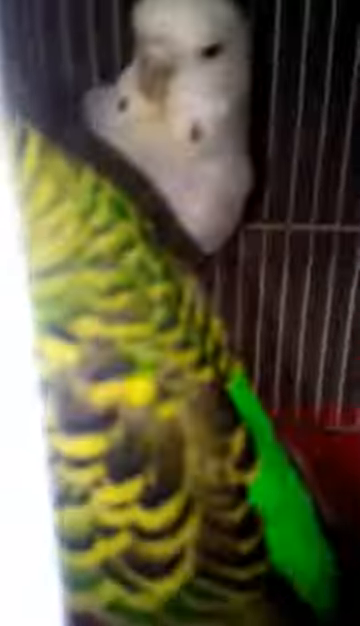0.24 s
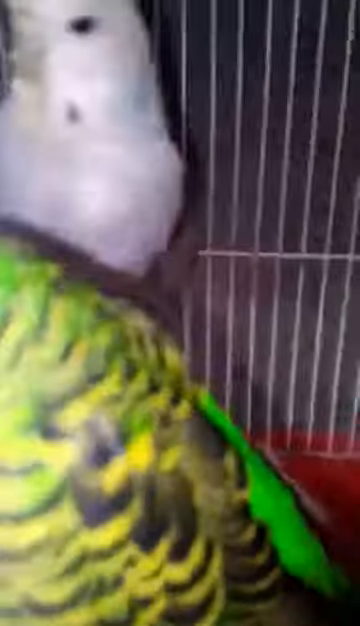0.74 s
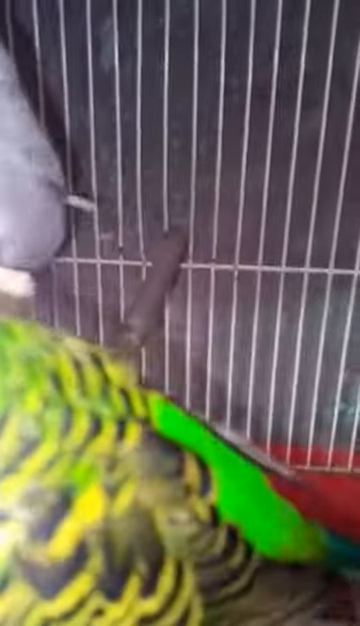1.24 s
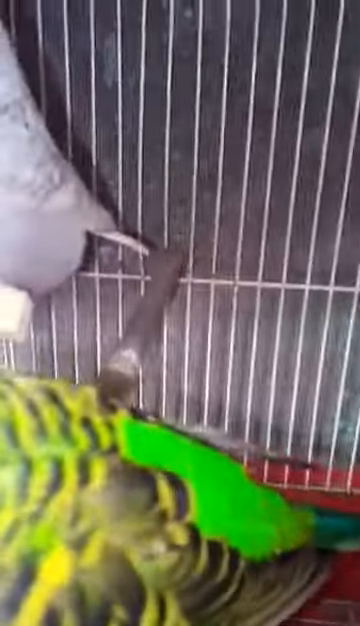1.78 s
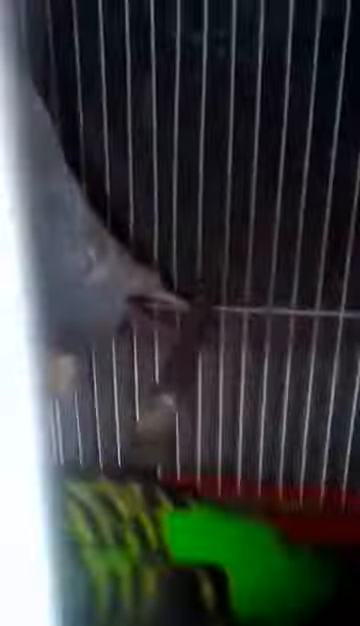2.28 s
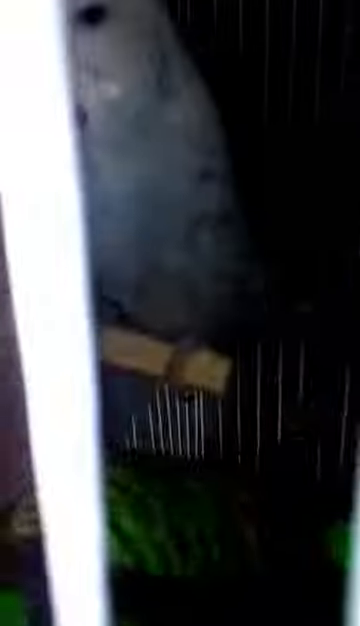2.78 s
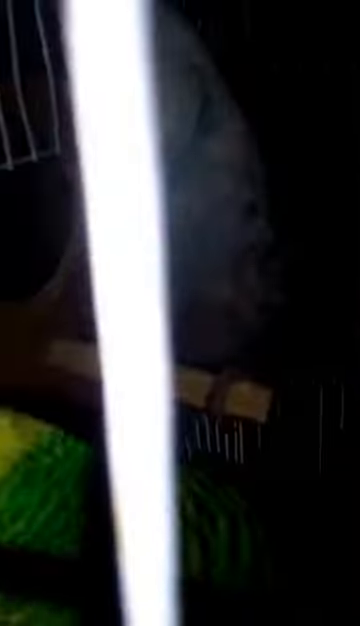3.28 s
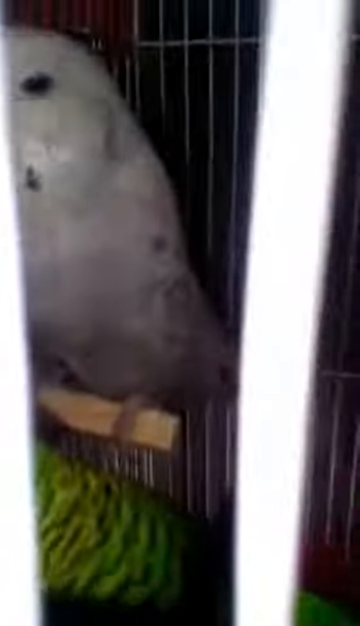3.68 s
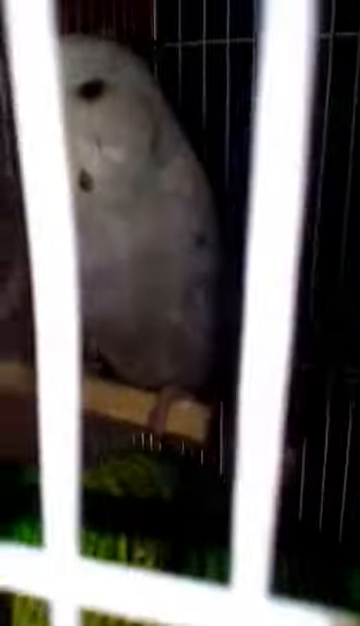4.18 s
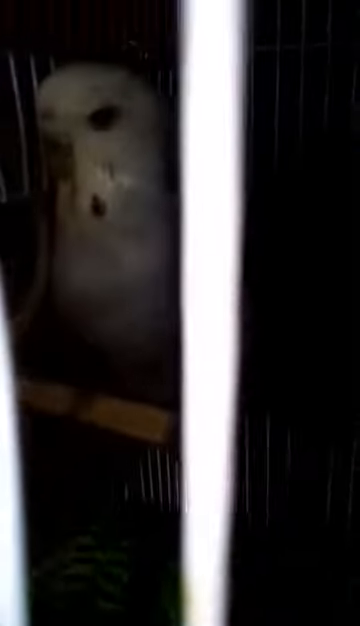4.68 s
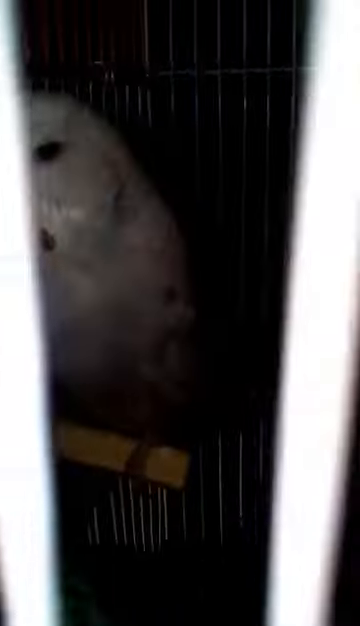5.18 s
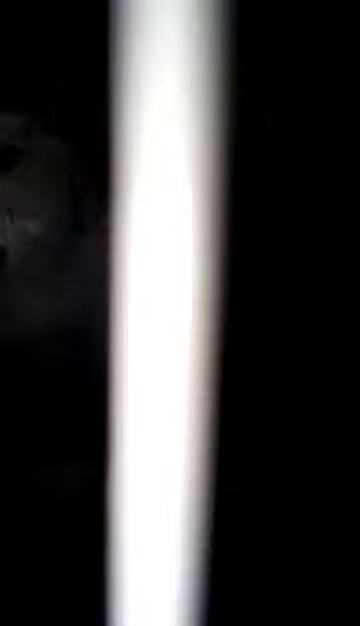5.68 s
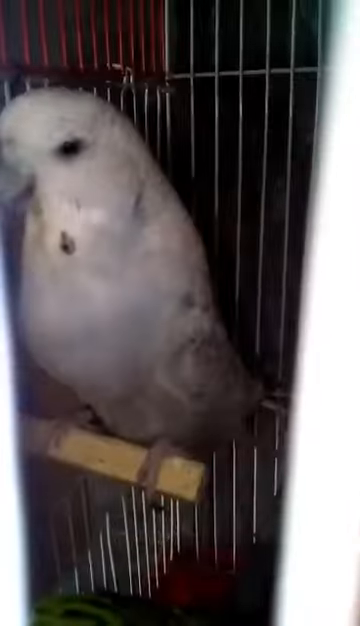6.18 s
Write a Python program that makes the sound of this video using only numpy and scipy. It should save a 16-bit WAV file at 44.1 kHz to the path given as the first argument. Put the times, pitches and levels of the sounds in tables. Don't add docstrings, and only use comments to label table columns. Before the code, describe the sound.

Raspy chick cries and shrill chirps overlap in a small hard room, then thin out before a close budgie warbles and chatters amid handling bumps.

```python
import sys
import numpy as np
from scipy import signal
from scipy.io import wavfile
from scipy.ndimage import uniform_filter1d

SR = 44100
rng = np.random.default_rng(int(sys.argv[2]) if len(sys.argv) > 2 else 0)


def master_out(mix):
    frames = np.transpose(np.atleast_2d(mix))
    ceiling = np.clip(frames, -1, 1)
    pcm = np.round(ceiling * 32767).astype(np.int16)
    wavfile.write(sys.argv[1], SR, pcm)


def elevation(decibels):
    levels = np.asarray(decibels, float)
    return 10 ** (levels / 20)


N = 284004


def filtered(x, order, hz, kind):
    return signal.sosfilt(signal.butter(order, hz, kind, fs=SR, output="sos"), x)


def rms_one(x):
    return x / np.sqrt(np.mean(x ** 2) + 1e-20)


def drift(rate_hz):
    r = np.exp(-2 * np.pi * rate_hz / SR)
    noise = rng.standard_normal(N + SR)
    return rms_one(signal.lfilter([1], [1, -2 * r, r * r], noise)[SR:])


def ring(clicks, hz, t60_s):
    r, w = elevation(-60 / (t60_s * SR)), 2 * np.pi * hz / SR
    return signal.lfilter([0, np.sin(w)], [1, -2 * r * np.cos(w), r * r], clicks + 1e-18)


def banded_noise(spectrum, patchy_db, patch_hz, together, extra_db=lambda hz: 0):
    hz_points, db_points = np.transpose(spectrum)
    edges = hz_points[0] * 2 ** np.arange(0, np.log2(hz_points[-1] / hz_points[0]), 1 / 3)
    white, shared = rng.standard_normal((2, N)), drift(patch_hz)
    out, power = 0, 0
    for k, (low, high) in enumerate(zip(edges, edges[1:])):
        band = filtered(white[k % 2], 2, [low, high], "band")
        hz = np.sqrt(low * high)
        gain = elevation(np.interp(np.log(hz), np.log(hz_points), db_points))
        power += gain ** 2 * np.mean(band ** 2)
        flicker = together * shared + (1 - together) * drift(patch_hz)
        out = out + band * gain * elevation(patchy_db * flicker + extra_db(hz))
    return out / np.sqrt(power)


def bursts_db(starts, holds, peak_db, rest_db, rise_db_per_s, fall_db_per_s):
    t = np.arange(0, N, 32) / SR
    early = np.maximum(starts[:, None] - t, 0)
    late = np.maximum(t - (starts + holds)[:, None], 0)
    each_db = peak_db[:, None] - rise_db_per_s * early - fall_db_per_s * late
    power = elevation(2 * each_db).sum(axis=0) + elevation(2 * rest_db)
    return np.interp(np.arange(N) / SR, t, 10 * np.log10(power))


def calls(table, waver, waver_hz, flutter_db, flutter_hz, rise_s):
    out, shake = np.zeros(N), drift(waver_hz)
    flutter = rms_one(elevation(flutter_db * drift(flutter_hz)))
    for k, (start, length, from_hz, to_hz, tone_db, octave_db) in enumerate(table):
        i = round(start * SR)
        t = np.arange(min(round(length * SR), N - i)) / SR
        own = (i + 7919 * k + np.arange(len(t))) % N
        pitch_hz = (from_hz + (to_hz - from_hz) * t / length) * (1 + waver * shake[own])
        phase = 2 * np.pi * np.cumsum(pitch_hz) / SR
        envelope = np.clip(np.minimum(t / rise_s, (length - t) / (0.35 * length)), 0, 1)
        upper = np.sin(2 * phase) + 0.086 * np.sin(3 * phase) + 0.022 * np.sin(4 * phase)
        out[i:i + len(t)] += envelope * flutter[own] * (elevation(tone_db) * np.sin(phase) + elevation(octave_db) * upper)
    return out


def with_octave(table, law):
    hz, db = np.transpose(law)
    return [(*row, row[4] + np.interp((row[2] + row[3]) / 2, hz, db)) for row in table]


def with_glide(table, glide):
    return [(s, length, hz * (1 - glide / 2), hz * (1 + glide / 2), tone_db, octave_db)
            for s, length, hz, tone_db, octave_db in table]


# start_s, hold_s, level_db, brightness_db, depth_db
BREATHS = [(0, 0.13, -42, -6.5, 7), (0.123, 0.16, -28.5, -12.5, -9), (0.325, 0.14, -29.5, -11, -5.5),
           (0.563, 0.15, -41.5, -24, 1), (0.73, 0.072, -53, 8, -4), (0.98, 0.24, -54.5, 2.5, 3.5),
           (1.35, 0.15, -51.5, 3.5, 5.5), (1.526, 0.15, -27.5, -18, -6.5), (1.778, 0.066, -33.5, -4.5, -2),
           (1.95, 0.083, -30, -8.5, -4.5), (2.059, 0.036, -25, -6, -5.5), (2.21, 0.14, -27, -3.5, -9.5),
           (2.437, 0.15, -40, 6, -4.5), (2.564, 0.18, -34, -3, -2), (3.25, 0.12, -50, -2, 0),
           (3.582, 0.079, -49, -1.5, 8), (3.725, 0.3, -48, -9, 1), (4.71, 0.2, -55, 12, 17),
           (4.994, 0.1, -32.5, -5, -1), (5.197, 0.34, -51.5, 5.5, 14.5), (5.474, 0.21, -55, 3.5, 12),
           (2.799, 0.016, -44, 9, 10), (5.793, 0.14, -48, -4.5, 3.5), (6.384, .06, -53, -8, 2)]
# frequency_hz, density_db (per Hz)
BEAK_SPECTRUM = [(1400, 5.5), (1750, -11), (2200, 2.5), (3300, -2), (4700, -3), (6500, 3), (7600, 3.5),
                 (8600, -16), (9800, -18), (11500, -12.5), (15000, -45)]


def hiss():
    s, hold, db, bright_db, deep_db = np.transpose(BREATHS)

    def course(extra_db, rest_db):
        return bursts_db(s, hold, db + extra_db, rest_db - 56, rise_db_per_s=707, fall_db_per_s=108)

    middle_db = course(0, 0)
    high_db, low_db = course(bright_db, -1) - middle_db, course(deep_db, 3) - middle_db

    def lean(hz):
        highness, lowness = np.clip(np.log2(hz / 4700) * 2, 0, 1), np.clip(np.log2(4200 / hz) * 2, 0, 1)
        return high_db * highness + low_db * lowness

    level = elevation(middle_db + 4.5 + 1.53 * drift(40) + 1.2 * drift(130))
    air = level * banded_noise(BEAK_SPECTRUM, patchy_db=3.5, patch_hz=9, together=0.2, extra_db=lean)
    return filtered(air, 4, 1600, "high")


STILL_HAND_DB = -68.5
# start_s, hold_s, rumble_db
GRIPS = [(0, 0.0043, -46), (0.126, 0.0093, -32), (0.253, 0.058, -52), (0.71, 0.03, -50),
         (1.016, 0.012, -57), (1.734, 0.28, -53), (1.87, 0.21, -48), (2.1, 0.12, -57.5),
         (2.416, 0.18, -58.5), (2.71, 0.13, -48), (2.933, 0.05, -53), (3.31, 0.017, -64),
         (3.473, 0.12, -60), (4.07, 0.024, -54), (4.885, 0.033, -52.5), (5.096, 0.22, -63),
         (5.45, 0.041, -40), (5.57, 0.24, -55), (5.863, 0.1, -49.5), (6.14, 0.059, -63)]


def grip_level():
    return bursts_db(*np.transpose(GRIPS), STILL_HAND_DB, rise_db_per_s=437, fall_db_per_s=264.5)


# frequency_hz, density_db (per Hz)
RUMBLE_SPECTRUM = [(15, -34), (25, -57), (54, 1.5), (119, -5.5), (167, -8.5), (204, -12.5), (260, -6),
                   (340, -60), (570, -120)]


def hand(grip_db):
    return elevation(grip_db - .1) * banded_noise(RUMBLE_SPECTRUM, patchy_db=4, patch_hz=9, together=.7)


# time_s, rustle_db
RESTLESSNESS = [(0, -52), (.5, -48), (.95, -48.5), (2.1, -51.5), (2.9, -52.5), (3.38, -47.5), (4.03, -51),
                (4.2, -54.5), (4.6, -56.5), (4.95, -51), (5.4, -50.5), (5.8, -52), (6.44, -53)]
# frequency_hz, density_db (per Hz)
RUSTLE_SPECTRUM = [(120, -39), (200, -26), (449, -1), (603, -4), (686, -6), (863, -5), (946, -4.5),
                   (1170, -5), (1800, -14.5), (2340, -41), (3960, -120)]


def bedding(grip_db):
    s, db = np.transpose(RESTLESSNESS)
    rustle_db = np.interp(np.arange(N) / SR, s, db) + 0.27 * (grip_db - STILL_HAND_DB)
    return elevation(rustle_db - 3.5) * banded_noise(RUSTLE_SPECTRUM, patchy_db=5.0, patch_hz=20.5, together=0.35)


# start_s, length_s, pitch_hz, tone_db
WHINES = [(0.211, 0.07, 3305, -17.5), (.35, 0.32, 3760, -28), (0.368, 0.054, 4140, -24),
          (.4, 0.14, 3382, -21.5), (0.437, 0.094, 2463, -24.5), (0.515, 0.045, 3105, -21.5),
          (0.708, 0.062, 2622, -20.5), (0.814, 0.14, 3753, -23.5), (0.859, 0.12, 3368, -27),
          (1.517, 0.064, 4510, -29), (1.541, 0.084, 3960, -24.5), (1.624, 0.026, 4450, -25.5),
          (3.639, 0.058, 2810, -42.5), (4.155, 0.075, 2236, -38), (4.847, 0.054, 2667, -31),
          (4.932, 0.046, 2756, -31), (4.988, 0.06, 3820, -27), (5.4, 0.027, 2070, -51),
          (5.93, 0.075, 3510, -50)]
# start_s, length_s, pitch_hz, tone_db, octave_db
SQUEALS = [(.47, 0.04, 1988, -27, -30), (1.07, 0.18, 2734, -53, -44), (2.199, 0.1, 3150, -29.5, -14.5),
           (2.25, 0.15, 3530, -40, -27), (2.63, 0.094, 2740, -37, -24), (3.265, 0.12, 2637, -45.5, -39),
           (3.785, 0.07, 2667, -36.5, -44.5), (4.4, 0.198, 2420, -50.5, -50.5),
           (5.025, 0.079, 2950, -24, -22), (4.97, 0.023, 2850, -33, -25), (4.79, 0.066, 3400, -60, -41),
           (.745, .07, 3880, -40, -31), (3.72, .04, 2600, -50, -44), (3.88, .06, 2480, -50, -44)]
# start_s, length_s, pitch_hz, tone_db, octave_db
PLEAS = [
    (.07, 0.055, 2510, -27, -40),
    (2.12, 0.064, 3400, -31.5, -19),
    (2.443, 0.11, 3324, -36, -15.5),
    (3.575, 0.054, 2138, -36.5, -42),
    (4.04, 0.0436, 2600, -34, -69),
    (4.94, 0.05, 2780, -31, -35.5),
]
# start_s, length_s, from_hz, to_hz, tone_db
MEWS = [(1.345, 0.045, 2940, 2860, -47.5), (1.465, 0.037, 2660, 2580, -47), (1.515, 0.028, 2495, 2420, -36),
        (2.07, 0.061, 3200, 3300, -29.5), (2.26, 0.059, 3760, 3600, -29), (2.31, 0.063, 3260, 3780, -30),
        (2.61, 0.13, 4080, 4040, -33), (3.625, 0.099, 2276, 2620, -41), (3.74, 0.077, 2480, 2550, -37.5),
        (3.875, 0.065, 2705, 2370, -39.5), (4.04, 0.064, 2210, 2187, -41.5), (4.075, .12, 2736, 2620, -49),
        (4.19, 0.094, 2280, 2230, -56), (4.758, 0.017, 2380, 2920, -29.5), (4.805, .05, 2480, 2464, -30),
        (4.855, 0.048, 2980, 2737, -34.5), (4.88, 0.038, 2726, 2570, -43),
        (4.985, 0.091, 2310, 2403, -31.5)]
# pitch_hz, octave_db
CHICK_OCTAVE = [(1800, -16), (2500, -10.5), (3900, -14.5)]


def husky_calls():
    table = with_glide([(*row, row[3] - 19) for row in WHINES], -0.0261)
    table += with_glide(SQUEALS, -0.0088)
    table += with_glide(PLEAS, 0.1208)
    table += with_octave(MEWS, CHICK_OCTAVE)
    return calls(table, waver=.043, waver_hz=350, flutter_db=3, flutter_hz=150, rise_s=.004)


# start_s, peak_db, hardness_hz
KNOCKS = [
    (0.0938, -4, 1810),
    (0.113, -10.5, 706),
    (4.0662, -9.5, 890),
    (5.453, -20, 400),
]
# frequency_hz, level_db, t60_s
BOX_MODES = [(110, -51, 0.25), (220, -9.5, 0.11), (277, 1.5, 0.07), (420, -13, 0.053), (513, 11.5, 0.032),
             (854, 8, 0.023)]


def knocks():
    out = np.zeros(N)
    for s, db, hard_hz in KNOCKS:
        i = round(s * SR)
        press = 2 * np.pi * hard_hz * np.arange(SR // 4) / SR
        blow = press * np.exp(-press) * 2 * np.pi * hard_hz / SR
        for hz, mode_db, t60_s in BOX_MODES:
            strength = elevation(db + mode_db - 19 + rng.normal(0, 0.093))
            out[i:i + SR // 4] += strength * ring(blow, hz, t60_s)
    return out


# start_s, length_s,
# from_hz, to_hz, tone_db
CHIRPS = [(.103, 0.061, 3970, 3710, -24.5), (.169, 0.048, 3040, 3545, -16), (.715, 0.011, 1885, 1880, -17),
          (.741, 0.075, 3746, 4038, -16), (.801, 0.06, 3153, 3388, -15), (1.428, 0.041, 2452, 2590, -35),
          (1.575, 0.016, 1740, 1860, -29), (1.579, 0.22, 3503, 3718, -20), (3.723, 0.016, 2510, 2550, -28),
          (4.012, 0.034, 2210, 2274, -39), (4.16, 0.11, 831, 800, -52), (4.73, 0.016, 2720, 2750, -50),
          (5.233, 0.0078, 2380, 2380, -20), (5.252, 0.026, 3730, 3550, -25),
          (5.268, 0.021, 1720, 1970, -30), (.895, 0.1, 621, 619, -48.5), (.9, .08, 458, 428, -51),
          (1.19, 0.13, 612, 611, -50), (1.5, 0.07, 1032, 1044, -42), (2.56, 0.098, 1254, 1234, -45),
          (3.32, 0.2, 621, 609, -49), (4.86, 0.094, 894, 865, -49), (5.74, .28, 620, 622, -55),
          (6.125, .09, 623, 615, -51), (6.13, 0.064, 415, 407, -50), (.19, .13, 3900, 3950, -32),
          (.52, .17, 3980, 3920, -35.5), (3.79, 0.051, 2800, 2780, -44), (3.88, 0.035, 2620, 2540, -53),
          (3.915, .03, 2420, 2290, -44)]


def chirps():
    table = with_octave(CHIRPS, CHICK_OCTAVE)
    return calls(table, waver=.025, waver_hz=250, flutter_db=3.2, flutter_hz=80, rise_s=.008)


# start_s, level_db
PUFFS = [(.123, -58), (.242, -61), (.331, -56), (.965, -62), (1.428, -62), (1.946, -54), (2.062, -52),
         (2.456, -52), (2.792, -53), (4.765, -43), (4.85, -49), (5.396, -55), (2.2, -54), (2.565, -54),
         (5.03, -55), (4.953, -57)]


def puffs():
    t = np.arange(N) / SR
    fade_s = 0.036
    envelope = sum(elevation(db) * (t > s) * np.exp(-np.abs(t - s) / fade_s) for s, db in PUFFS)
    return envelope * rms_one(filtered(rng.standard_normal(N), 4, 8000, "high"))


# start_s, length_s, pitch_hz, tone_db, octave_db
RASPS = [(.124, 0.066, 3190, -21, -25.5), (.342, 0.043, 3157, -27.5, -18.5), (.56, 0.055, 3390, -32, -34),
         (1.54, 0.092, 3143, -25.5, -34.5), (1.66, 0.091, 3300, -31, -24.5), (1.793, 0.021, 3270, -25, -18),
         (1.95, 0.06, 2796, -29.5, -21.5), (2.062, 0.062, 3007, -33, -18),
         (2.565, 0.07, 2925, -31.5, -16.5), (2.57, 0.1, 3980, -29.5, -67), (3.965, 0.039, 1987, -39.5, -45),
         (5.06, 0.17, 2357, -29, -45), (5.08, 0.17, 3284, -22.5, -34), (5.14, 0.13, 2322, -30.5, -55),
         (5.68, 0.012, 2103, -35, -52), (.74, .2, 3550, -29, -50), (.72, .09, 3000, -32, -50),
         (2.45, .1, 3250, -33, -30), (4.855, .03, 2850, -36, -34), (4.768, .03, 2450, -34, -38)]


def rasps():
    table = with_glide(RASPS, -0.013)
    return calls(table, waver=.1, waver_hz=400, flutter_db=2.2, flutter_hz=200, rise_s=.008)


# start_s, peak_db, frequency_hz
THUMPS = [(0.242, -31, 101), (0.698, -38, 110), (1.497, -41, 110), (1.946, -34, 207), (2.513, -30, 76),
          (4.083, -34, 75.5), (1.007, -47, 86.5), (1.2, -52, 67.3), (1.43, -53, 94.5), (1.734, -40, 120),
          (1.87, -38, 95), (2.159, -47.5, 180), (2.2, -49, 80), (2.415, -49, 74), (2.731, -38, 125),
          (2.801, -42, 100), (2.86, -43, 110), (3.05, -46, 67), (3.3, -51, 90), (3.51, -46, 70),
          (3.589, -50, 65), (4.27, -50, 70), (4.396, -53, 94), (4.89, -46, 60), (5.06, -46, 75),
          (5.142, -46, 100), (5.99, -36, 65), (6.106, -46, 78)]


def thumps():
    out, t = np.zeros(N), np.arange(-SR // 50, SR // 20) / SR
    for s, db, hz in THUMPS:
        i = round(s * SR) - SR // 50
        out[i:i + len(t)] += elevation(db) * np.sin(2 * np.pi * hz * t) * np.exp(-((t - .012) / 0.0079) ** 2)
    return out


# start_s, peak_db
TICKS = [(2.9564, -32), (3.291, -29), (3.418, -32), (3.586, -27.5), (3.6671, -33), (4.221, -35.5),
         (4.7972, -21), (4.96, -31), (5.471, -30.5), (6.0463, -34), (6.168, -32), (6.219, -40),
         (1.565, -28), (1.577, -20), (1.641, -24), (4.734, -46), (5.72, -43)]


def ticks():
    s, db = np.transpose(TICKS)
    clicks = np.zeros(N)
    clicks[np.round(s * SR).astype(int)] = elevation(db)
    hits = filtered(clicks, 3, [4500, 7800], "band")
    return elevation(-5) * sum(ring(hits, hz, .018) for hz in (5900, 6400, 6900, 7400))


# start_s, length_s, pitch_hz, level_db
PEEPS = [
    (4.681, 0.059, 903, -42),
    (6.169, .022, 1152, -32),
    (6.19, 0.043, 1123, -43),
    (6.245, 0.045, 1120, -56),
    (6.372, 0.025, 1358, -36.5),
    (6.387, .045, 1320, -45),
]
# frequency_hz, gain_db
PEEP_THROAT = [(900, -7), (1300, -11.5), (2300, -1), (2700, -4), (3400, -8.5), (4300, -17.5), (5500, -20),
               (6800, -26)]


def peeps():
    hz_points, db_points = np.transpose(PEEP_THROAT)
    out, shake, order = np.zeros(N), drift(150), np.arange(1, 8)[:, None]
    for start, length, hz, db in PEEPS:
        i = round(start * SR)
        t = np.arange(round(length * SR)) / SR
        swoop = 1 - .15 * np.exp(-t / 0.0039)
        pitch_hz = hz * swoop * (1 + .008 * shake[i:i + len(t)])
        envelope = np.clip(np.minimum(t / 0.00085, (length - t) / (.5 * length)), 0, 1)
        strength = elevation(db + np.interp(order * hz, hz_points, db_points))
        harmonics = strength * np.sin(2 * np.pi * order * np.cumsum(pitch_hz) / SR)
        out[i:i + len(t)] += envelope * harmonics.sum(axis=0)
    return out


# start_s, length_s, from_hz, to_hz, tone_db
WARBLE = [(4.762, .015, 970, 1200, -41), (4.77, 0.04, 2690, 2300, -25), (5.295, 0.044, 2744, 3020, -18),
          (5.3235, 0.017, 3020, 3080, -28), (5.334, 0.0073, 3190, 3030, -17),
          (5.346, 0.024, 2396, 2256, -20), (5.372, 0.012, 2170, 1820, -21),
          (5.384, 0.0052, 3040, 3000, -45), (5.386, 0.0072, 1570, 1445, -28.5),
          (5.461, .015, 3060, 3200, -31.5), (5.475, 0.0028, 2970, 2900, -26),
          (5.528, 0.0068, 2700, 2730, -20), (5.55, 0.024, 2822, 2846, -17.5),
          (5.568, 0.0087, 3180, 2900, -20), (5.595, .0068, 2960, 2850, -42),
          (5.39, 0.079, 2020, 2046, -40.5), (5.457, 0.016, 1500, 1516, -38), (5.475, .04, 3450, 3960, -37),
          (5.54, 0.018, 1600, 2700, -31), (5.595, 0.076, 2850, 2790, -36.5),
          (5.69, 0.026, 2100, 1800, -40.5),
          (5.785, 0.006, 3070, 2930, -25), (5.79, 0.013, 2740, 1950, -37), (5.8, 0.021, 4090, 3700, -40),
           (5.81, 0.0056, 3070, 3030, -25), (5.823, 0.0078, 3090, 3050, -20),
           (5.839, 0.0046, 2140, 1590, -25), (5.848, 0.0069, 1860, 1940, -28),
           (5.858, 0.028, 2818, 2590, -25), (5.881, .011, 2675, 3180, -17),
           (5.892, 0.0054, 2770, 2830, -26), (5.905, 0.0037, 2270, 3050, -16.5),
           (5.906, 0.019, 3276, 3610, -28), (5.915, 0.081, 2700, 2767, -40), (5.767, .015, 4500, 4000, -48),
           (5.935, 0.055, 3450, 3420, -37), (6.168, 0.0037, 2970, 3180, -25.5),
           (6.37, 0.0039, 2330, 2450, -38), (6.375, 0.0061, 2900, 2900, -38),
           (6.383, 0.013, 5330, 5200, -51)]
# pitch_hz, octave_db
ADULT_OCTAVE = [(700, -13), (1300, 6), (1700, 10), (2300, -39)]


def grown_bird():
    table = with_octave(WARBLE, ADULT_OCTAVE)
    return calls(table, waver=.013, waver_hz=200, flutter_db=2.2, flutter_hz=120, rise_s=.003)


# start_s, peak_db, frequency_hz
JOLTS = [
    (5.4355, -34, 90),
    (5.4541, -20, 128),
    (5.48, -33, 110),
    (5.495, -32, 170),
    (5.518, -38, 190),
    (5.567, -40, 120),
]


def jolts():
    out, t = np.zeros(N), np.arange(-SR // 50, SR // 50) / SR
    for s, db, hz in JOLTS:
        i = round(s * SR) - SR // 50
        out[i:i + len(t)] -= elevation(db + 6) * np.sin(2 * np.pi * hz * t) * np.exp(-(3.2 * hz * t) ** 2)
    return out


def room(x):
    t = np.arange(SR // 2) / SR
    t60_s, level_db = 0.44, -1.5
    tail = rng.standard_normal(len(t)) * elevation(-60 * t / t60_s) * (t > .004)
    return elevation(level_db) * signal.fftconvolve(x, tail / np.sqrt(np.sum(tail ** 2)))[:N]


# start_s, length_s, depth_db
DUCKS = [(0.725, 0.17, 20.5), (1.077, 0.08, 6.5), (1.643, 0.095, 13.5), (2.206, 0.14, 10.5),
         (2.467, 0.093, 17), (2.564, 0.1, 9), (3.202, 0.108, 8), (4.76, .09, 5), (4.4, .08, 6),
         (4.11, .05, 6), (5.327, 0.053, 10), (5.566, 0.055, 7), (6.257, 0.099, 8.5)]


def ducked(x):
    t = np.arange(N) / SR
    edge_s, below_hz = 0.018, 1630
    sink_db = sum(db * np.clip(np.minimum(t - s, s + length - t) / edge_s + .5, 0, 1) for s, length, db in DUCKS)
    low = signal.sosfiltfilt(signal.butter(6, below_hz, fs=SR, output="sos"), x)
    return x - low * (1 - elevation(-sink_db))


def scene():
    brood = chirps() + husky_calls() + rasps() + ticks()
    adult = grown_bird()
    grip_db = grip_level()
    litter = bedding(grip_db)
    handling = hand(grip_db)
    adult += peeps()
    voices = elevation(-1.5) * brood + adult + room(brood + elevation(-3.5) * adult)
    airborne = ducked(voices + hiss() + puffs() + litter)
    return (airborne + handling + knocks() + thumps() + jolts())[None]


def masked_treble(x, masked_db, slope_db, chance_db):
    hz, _, frames = signal.stft(x, SR, nperseg=1024)
    width = 4
    power = (np.abs(frames[:512]).reshape(-1, width, frames.shape[1]) ** 2).mean(axis=1)
    band_hz = hz[:512:width, None]
    masker = power[(band_hz[:, 0] > 5000) & (band_hz[:, 0] < 7800)].mean(axis=0)
    luck = uniform_filter1d(rng.standard_normal(power.shape), size=8, axis=1)
    limit_db = -masked_db - slope_db * (band_hz - 9000) / 1000 + chance_db * luck
    limit_db = limit_db + 7 * (np.abs(band_hz - 8500) < 330)
    dropped = (power < masker * elevation(2 * limit_db)) & (band_hz > 7900)
    frames[:512] *= np.repeat(~dropped, width, axis=0)
    return signal.istft(frames, SR, nperseg=1024)[1][:N]


def top_cut(x):
    return signal.sosfilt(signal.butter(12, 14410, fs=SR, output="sos"), x)


def record(dry):
    body = signal.sosfilt(signal.ellip(5, .5, 32, 7800, fs=SR, output="sos"), dry)
    top = signal.sosfilt(signal.ellip(4, .5, 50, [9050, 13900], "band", fs=SR, output="sos"), dry)
    heard = filtered(body + elevation(-3.5) * top, 2, 55, "high")
    mix = masked_treble(heard[0], masked_db=27, slope_db=.6, chance_db=14)[None]
    return top_cut(mix)


dry = scene()
out = record(dry)
master_out(out)
```